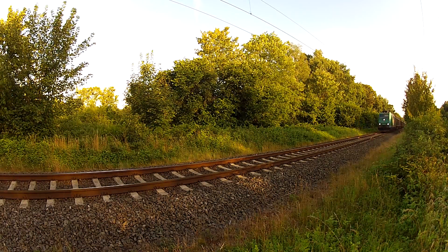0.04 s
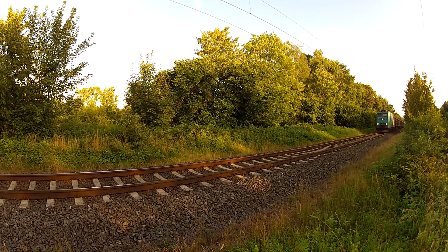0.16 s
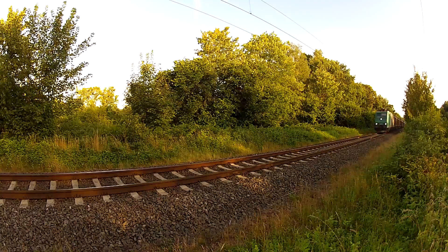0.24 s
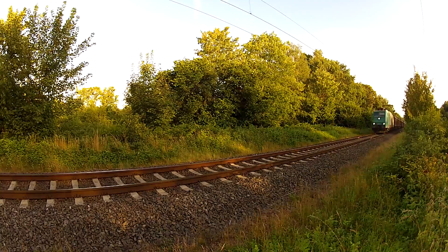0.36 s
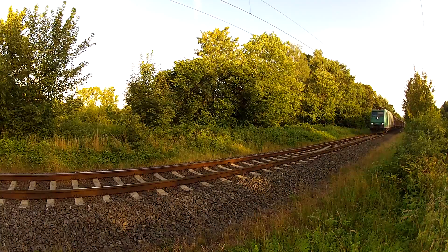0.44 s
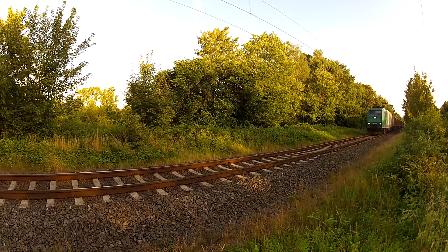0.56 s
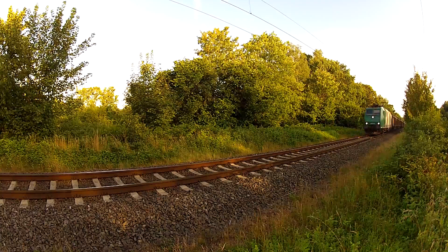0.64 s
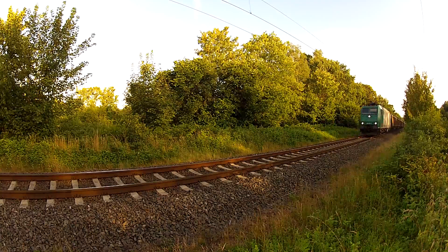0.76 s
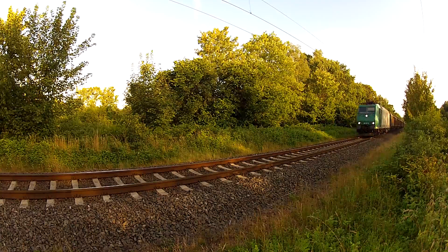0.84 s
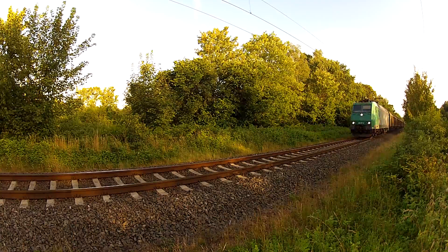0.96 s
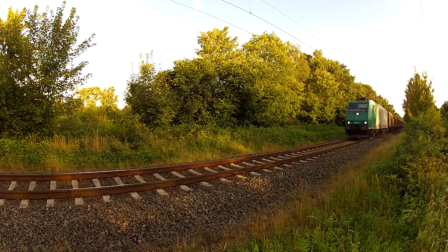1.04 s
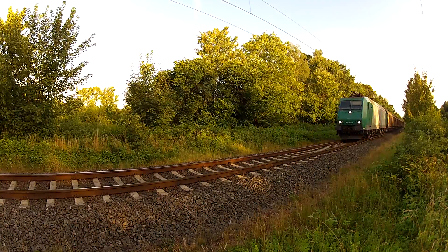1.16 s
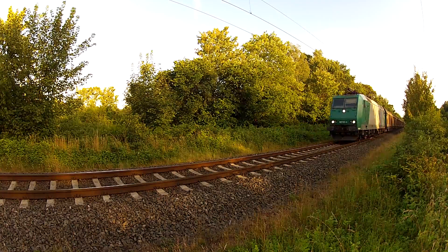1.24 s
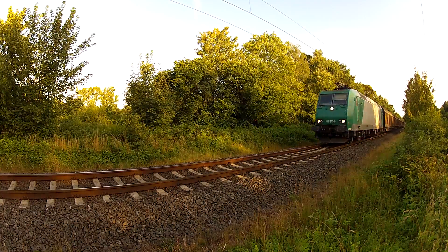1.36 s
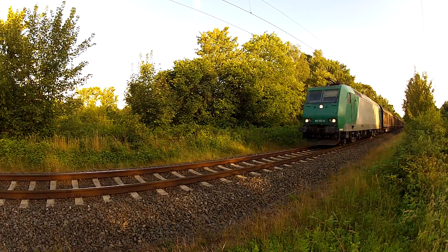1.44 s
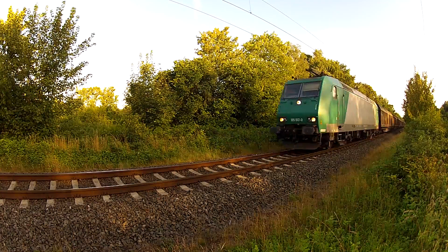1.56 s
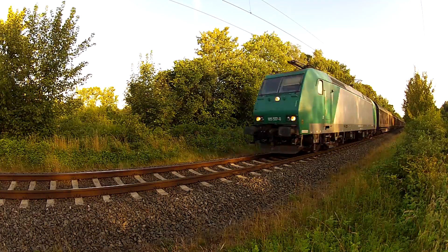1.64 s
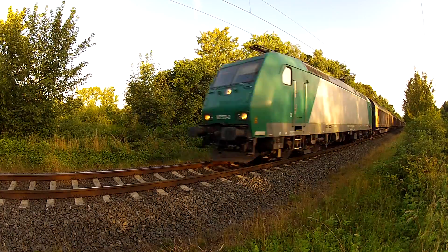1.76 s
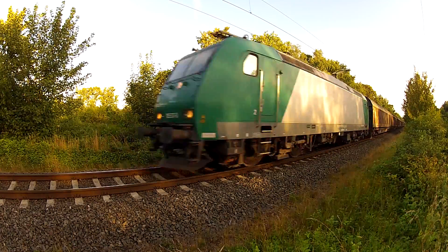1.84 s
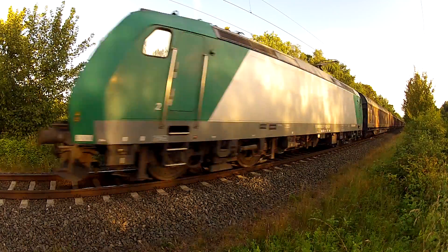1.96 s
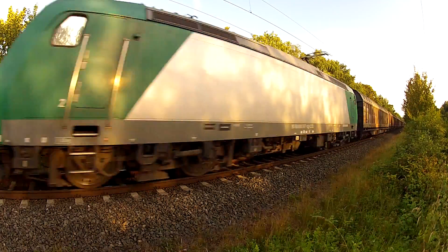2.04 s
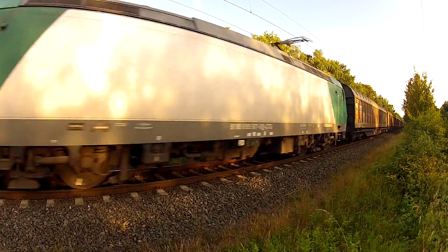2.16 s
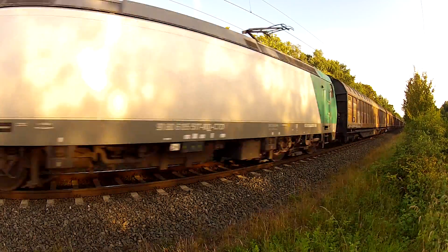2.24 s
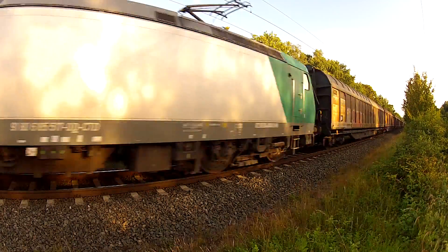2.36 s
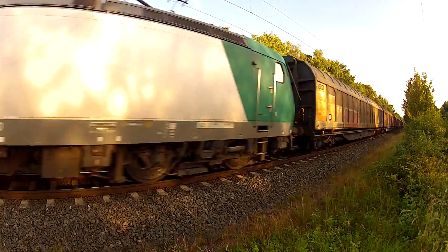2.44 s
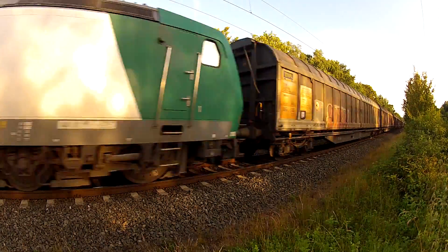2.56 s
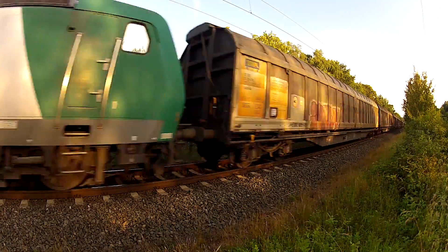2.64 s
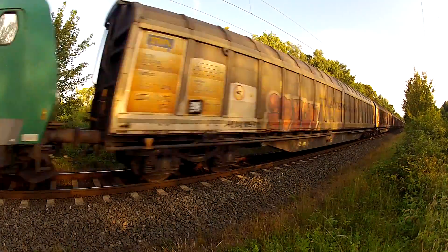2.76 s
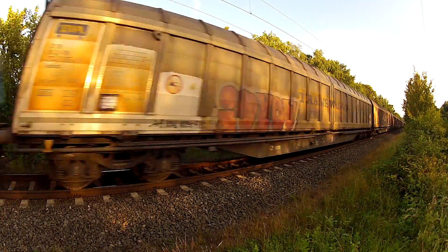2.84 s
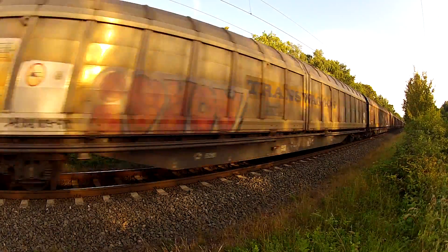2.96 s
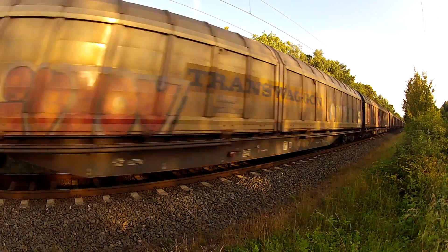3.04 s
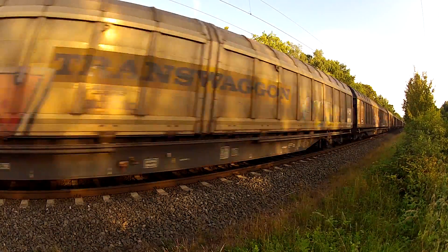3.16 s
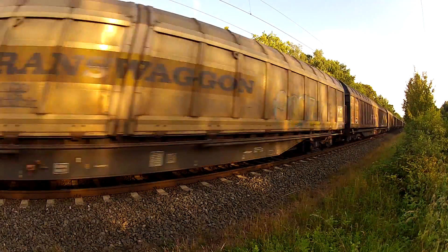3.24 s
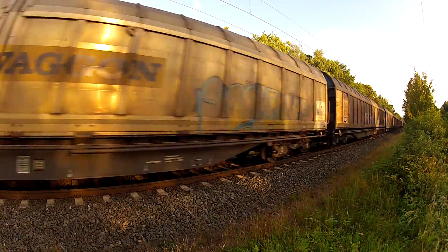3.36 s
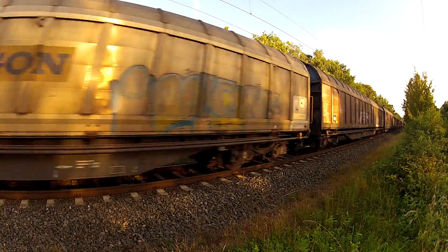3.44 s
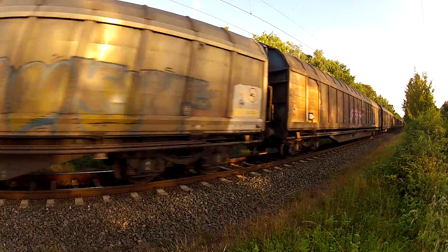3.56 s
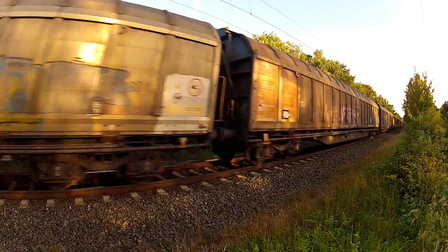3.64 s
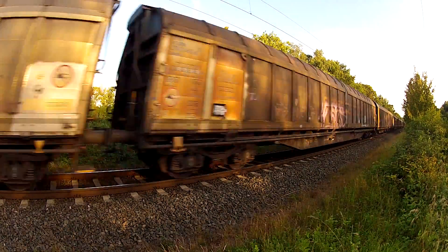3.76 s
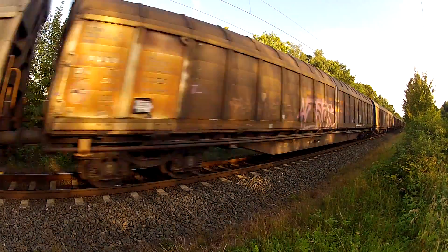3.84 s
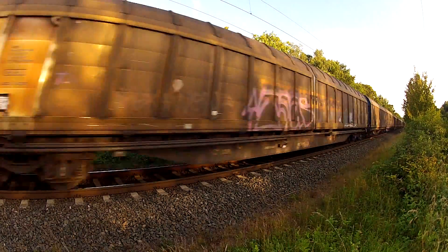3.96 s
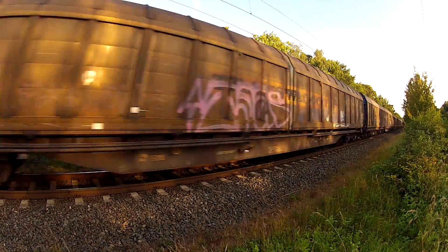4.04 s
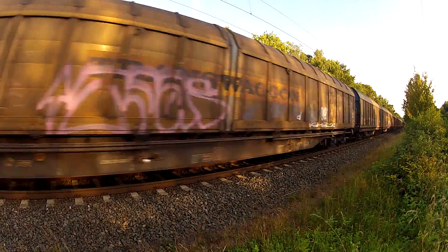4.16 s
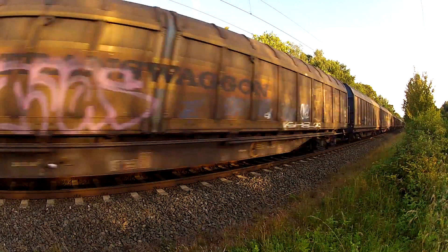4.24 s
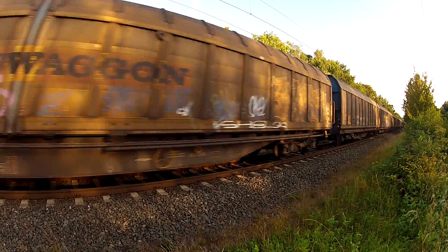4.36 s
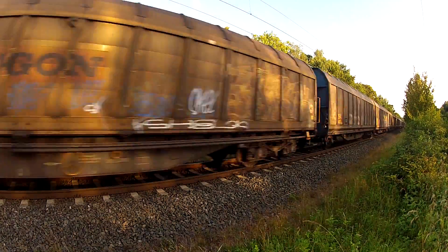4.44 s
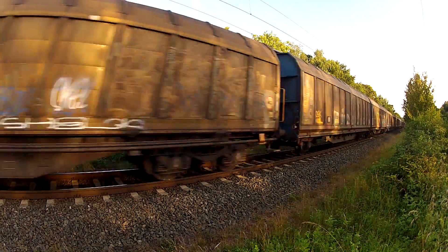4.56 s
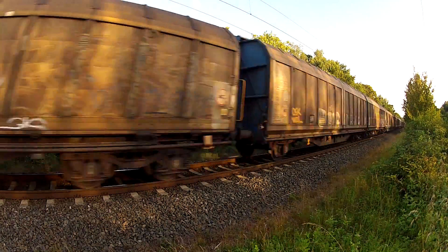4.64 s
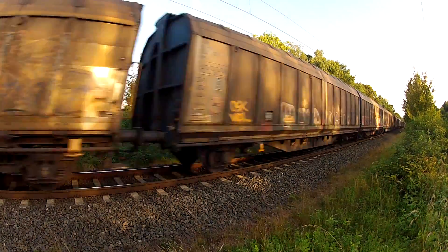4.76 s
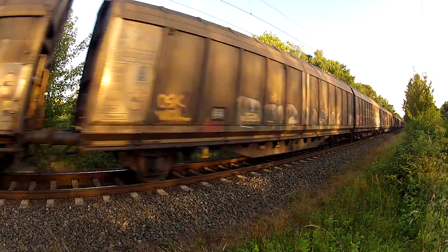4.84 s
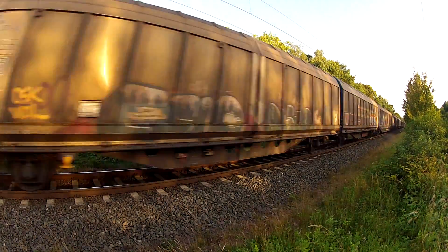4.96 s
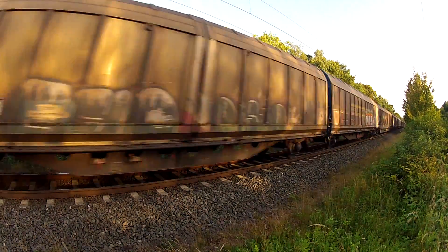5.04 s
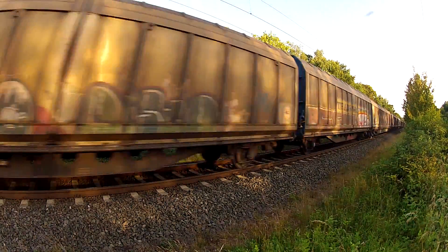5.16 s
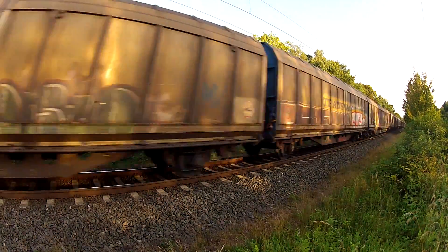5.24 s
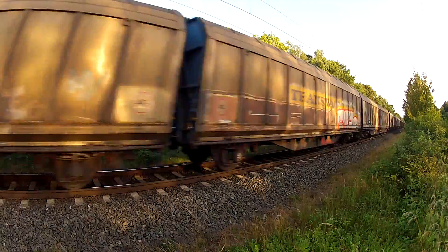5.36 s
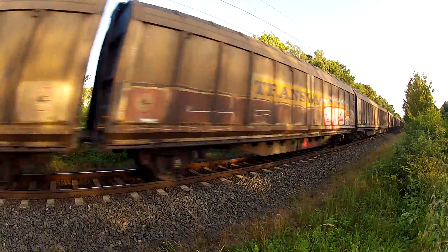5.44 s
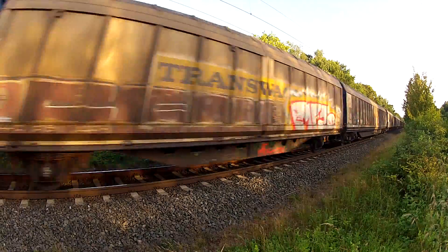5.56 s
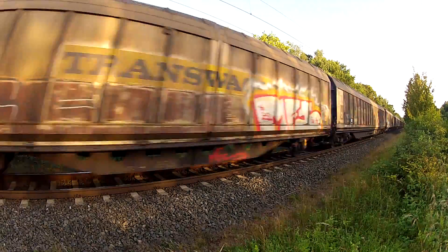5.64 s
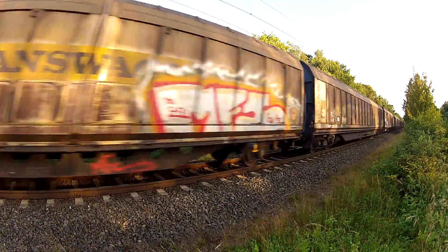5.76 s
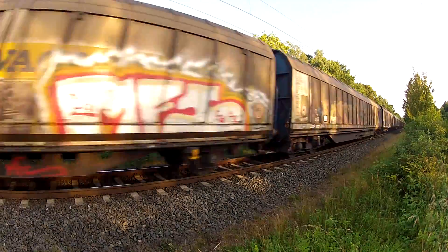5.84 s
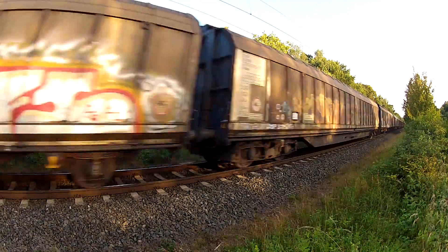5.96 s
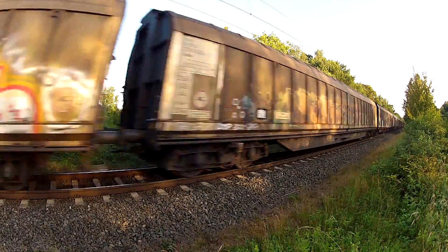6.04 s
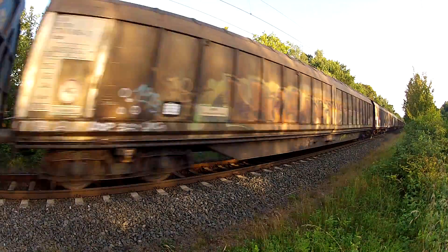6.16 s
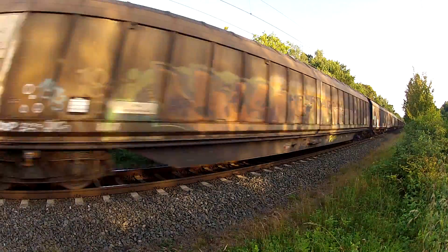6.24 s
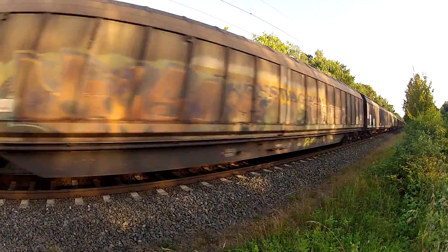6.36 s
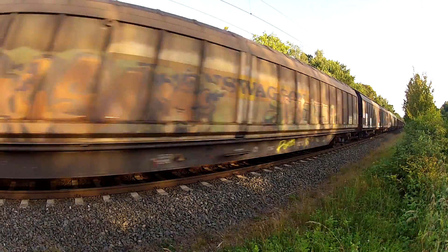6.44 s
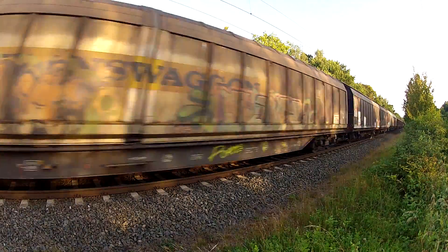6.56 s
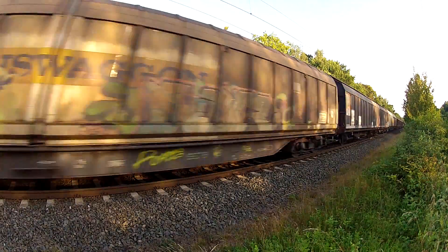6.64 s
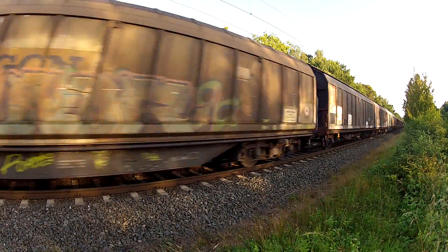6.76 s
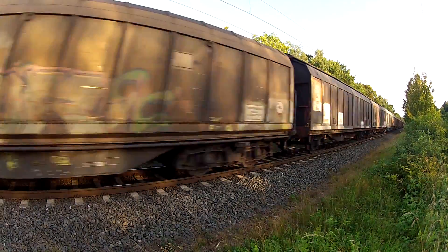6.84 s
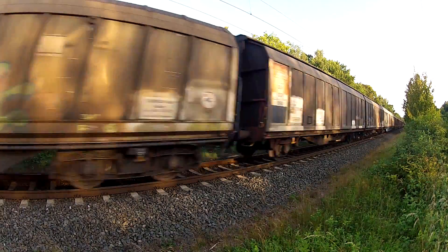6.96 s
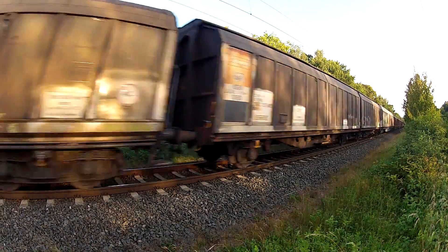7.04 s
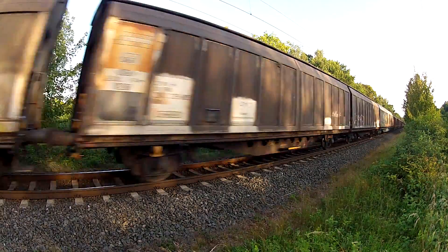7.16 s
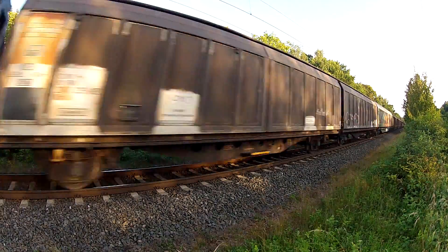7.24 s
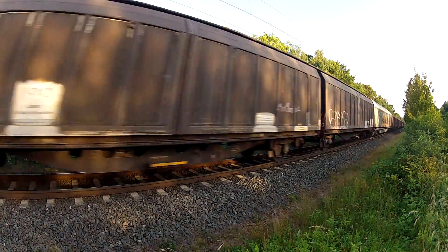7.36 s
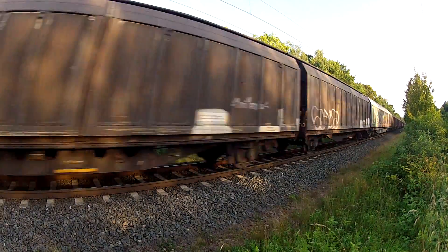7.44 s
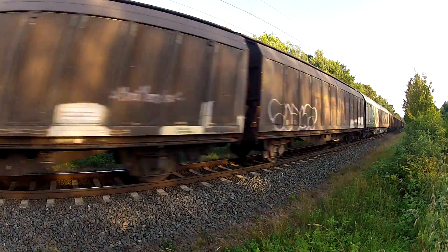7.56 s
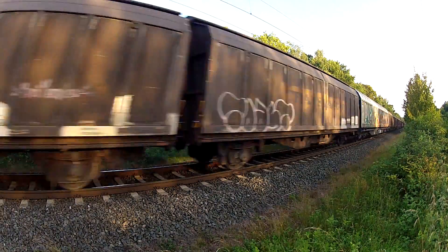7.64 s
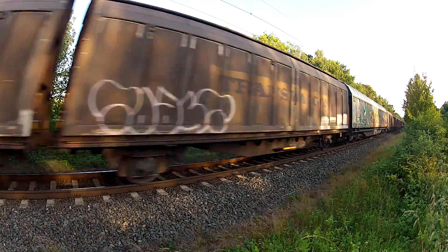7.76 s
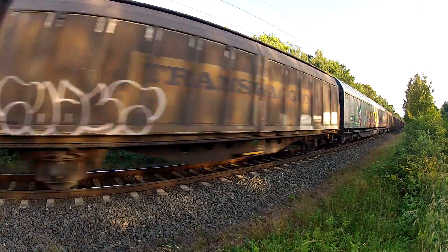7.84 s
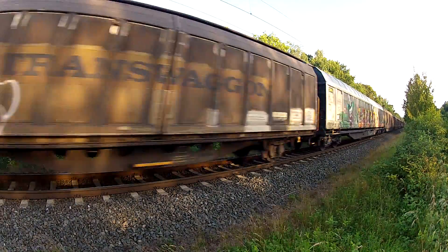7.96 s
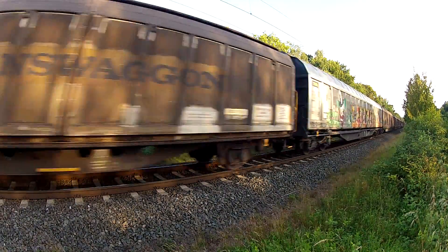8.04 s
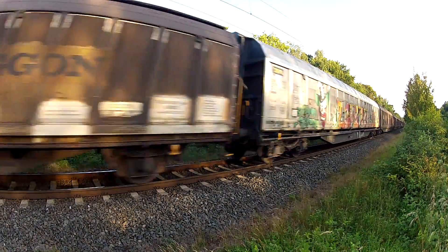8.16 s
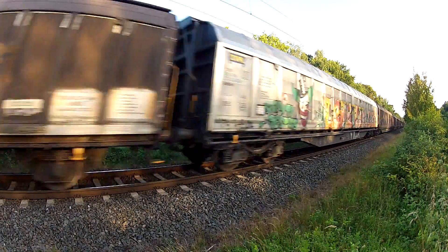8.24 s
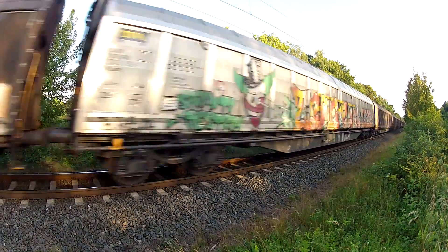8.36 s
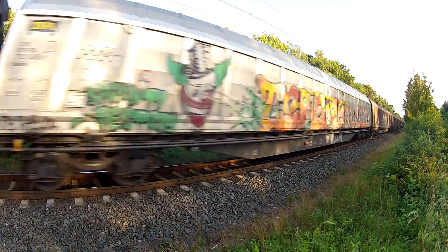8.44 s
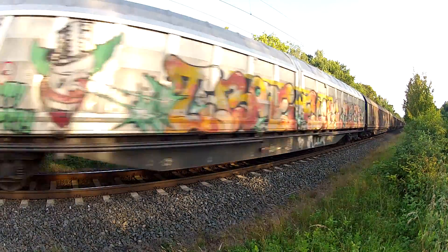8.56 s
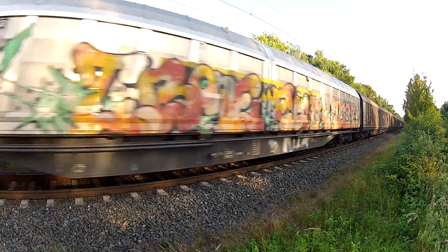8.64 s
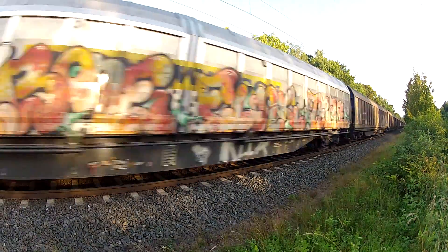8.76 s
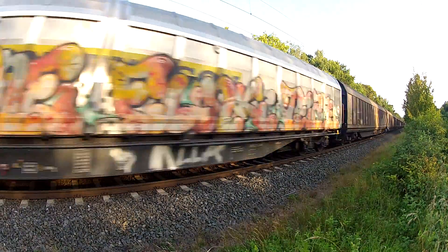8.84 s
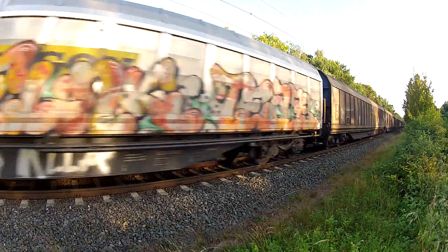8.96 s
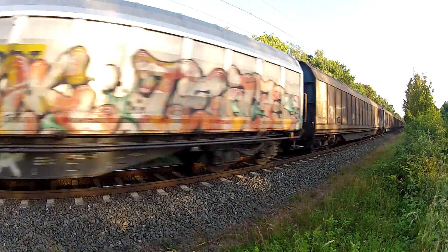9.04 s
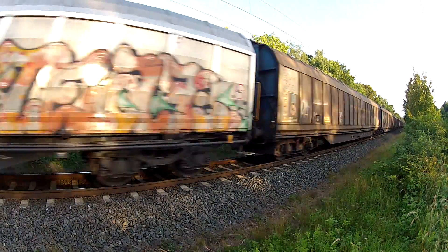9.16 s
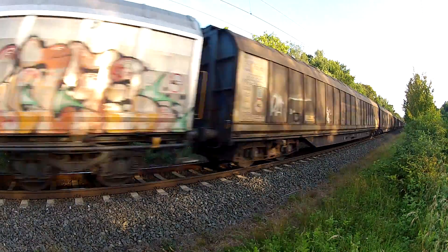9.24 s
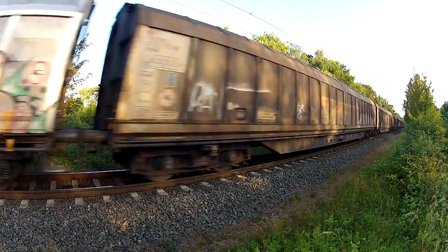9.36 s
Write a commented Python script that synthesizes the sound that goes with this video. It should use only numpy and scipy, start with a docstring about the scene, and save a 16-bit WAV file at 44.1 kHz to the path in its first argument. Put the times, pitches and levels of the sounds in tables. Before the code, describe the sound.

A long freight train passes a small stationary microphone at close range in the open air. It starts almost silent, swells sharply within about two seconds as the whining locomotive arrives, then continues as rumbling, pulsing wagons. Rough wheels ring louder in some passes and softer in others, with short singing tones, occasional steel clinks and grainy, lo-fi high frequencies. The train is still passing at the end.

```python
"""An electric freight train rounds a bend and rolls past a few metres away on welded rails, locomotive first.
Rolling contact excites resonances of wheels and track; the axles drum over the sleepers and shake the ground.
The locomotive whines with a Doppler fall, single wheels sing out and loose fittings clink over a faint hush.
A small camera hears it: sampling slowly and holding each value folds the sound into a gritty treble."""
import sys
import numpy as np
from scipy import signal
from scipy.fft import rfft, irfft, next_fast_len
from scipy.io import wavfile

SR = 44100
rng = np.random.default_rng(int(sys.argv[2]) if len(sys.argv) > 2 else 0)


def wav_out(sig):
    """Save sig, one row per channel (or a flat mono array), as 16-bit PCM at SR to the path in sys.argv[1]."""
    wavfile.write(sys.argv[1], SR, np.round(np.clip(np.atleast_2d(sig).T, -1, 1) * 32767).astype(np.int16))


N = 414981
TIME = np.arange(N) / SR
FFT_SIZE = next_fast_len(N)
FREQS = np.maximum(np.arange(FFT_SIZE // 2 + 1) * SR / FFT_SIZE, 1)  # Hz, kept above zero for the logarithm

SPEED_M_S, SOUND_M_S = 22.9, 343
SLEEPER_HZ = 38.1  # sleepers crossed per second
LOCO_PASSES_S, LOCO_DISTANCE_M = 2.3, 11
AIR_REACH_M, GROUND_REACH_M = 6.2, 7.44  # along the track, where a bogie's amplitude has dropped to half


def undb(db):
    """Decibel definition: a level becomes an amplitude ratio."""
    return 10 ** (np.asarray(db) / 20)


def curves(table):
    """Linear interpolation in time: each column after the first becomes a curve."""
    times_s, *columns = np.transpose(table)
    return [np.interp(TIME, times_s, column) for column in columns]


def noise(gain):
    """Linear filtering: white noise is weighted by a gain at each frequency and scaled to rms 1."""
    spectrum = gain * rfft(rng.standard_normal(FFT_SIZE))
    x = irfft(spectrum, FFT_SIZE)[:N]
    return x / np.std(x)


def coloured(points):
    """Spectral shaping: noise follows (Hz, dB) points joined on a logarithmic frequency axis."""
    hz, db = np.transpose(points)
    levels_db = np.interp(np.log(FREQS), np.log(hz), db, left=-90, right=-90)
    return noise(undb(levels_db))


def resonance(hz, width_hz):
    """Random excitation of a resonance: noise in a steep band, at half amplitude at the edges of its width."""
    return noise(1 / (1 + (2 * (FREQS - hz) / width_hz) ** 2))


def walk(rate_hz):
    """Slow random fluctuation: Gaussian lowpass noise scaled to a standard deviation of 1."""
    size = N // 50
    fluctuation_hz = np.arange(size // 2 + 1) * SR / N
    lowpass = np.exp(-(fluctuation_hz / rate_hz) ** 2 / 2)
    x = irfft(lowpass * rfft(rng.standard_normal(size)), size)
    return np.interp(TIME, np.linspace(0, N / SR, size), x / np.std(x))


def turn(hz):
    """Phase is the time integral of frequency."""
    return 2 * np.pi * np.cumsum(hz) / SR


# spectrum of the outdoor hush: pitch_hz [Hz], level_db [dB, relative]
HUSH_SPECTRUM = [(15, 0), (50, 1), (120, -5.5), (220, -1.5), (330, -10), (600, -26), (1100, -13),
                 (2500, -24), (5500, -30)]


def outdoor_hush():
    """Ambient noise: a broad spectrum whose level drifts at random."""
    return coloured(HUSH_SPECTRUM) * undb(-63 + walk(2.5))


# loose fittings and couplings: start_s [s], pitch_hz [Hz], level_db [dB]
CLINK_EVENTS = [(2.275, 3440, -36), (4.782, 3420, -28), (5.198, 5680, -43), (5.482, 5560, -45),
                (5.893, 5500, -47), (6.092, 3650, -37), (6.598, 4900, -51), (6.676, 3720, -43),
                (8.162, 4680, -39)]


def clinks(t60=.15, rise_s=.004, split_hz=45):
    """Impact and free decay: steel knocks on steel and rings briefly in a close pair of modes."""
    out, t = np.zeros(N), TIME[:SR // 4]
    envelope = (1 - np.exp(-t / rise_s)) * np.exp(-np.log(1000) * t / t60)  # 60 dB of decay in t60
    chances = rng.standard_normal((len(CLINK_EVENTS), 2))
    for (start_s, pitch_hz, level_db), (split, phase) in zip(CLINK_EVENTS, chances):
        mode = np.sin(2 * np.pi * pitch_hz * t)
        partner = 0.27 * np.sin(2 * np.pi * (pitch_hz + split_hz * split) * t + phase)
        clink = undb(level_db) * envelope * (mode + partner)
        start = int(start_s * SR)
        out[start:start + len(t)] += clink[:N - start]
    return out


# single wheels singing out in passing: middle_s [s], pitch_hz [Hz], level_db [dB rms], half_length_s [s]
SINGING_EVENTS = [(0.703, 1670, -68, 0.29), (0.91, 2360, -72, 0.47), (1.097, 3510, -75, 0.53),
                  (2.08, 3170, -59, .13), (2.597, 1410, -47, 0.072), (3.357, 1664, -49.5, 0.062),
                  (3.665, 1690, -43.5, 0.049), (3.802, 2965, -42, 0.092), (4.034, 2170, -39, 0.046),
                  (4.606, 2975, -42.5, 0.085), (4.855, 3325, -45, .1), (5.2, 1946, -45, 0.14),
                  (5.3, 2060, -42, 0.05), (5.325, 2710, -50, .11), (5.52, 3950, -58, .12),
                  (6.256, 3670, -56.5, 0.15), (6.824, 4160, -58, 0.063), (6.934, 1665, -48, 0.066),
                  (7.047, 1400, -45, 0.073), (7.129, 2856, -46, 0.15), (7.247, 2216, -40.5, 0.096),
                  (8.704, 2474, -44, 0.12), (8.8, 3840, -55, .22), (8.829, 1845, -43, 0.25)]


def singing_wheels(width_hz=32, doppler=.006):
    """Narrow-band modal response: one wheel mode swells and fades, its pitch sinking as the wheel passes."""
    out, in_phase, quadrature = 0, walk(width_hz), walk(width_hz)
    for middle_s, pitch_hz, level_db, half_length_s in SINGING_EVENTS:
        place = (TIME - middle_s) / half_length_s
        phase = turn(pitch_hz * (1 - doppler * np.tanh(place)))
        tone = in_phase * np.sin(phase) + quadrature * np.cos(phase)
        out = out + undb(level_db) * np.exp(-place ** 2 / 2) * tone
    return out


# locomotive drive: time_s [s], level_db [dB rms before its flicker], unsteadiness [0-1]
DRIVE_WHINE = [(0, -85, .6), (.9, -72.5, 0.65), (1.55, -66.5, 0.7), (1.72, -53.5, 0.34), (2.2, -54.5, 1),
               (2.5, -60, .95), (2.88, -55.5, 0.6), (3.2, -73, .77), (3.6, -92, .8)]
# the locomotive's heavy axles: time_s [s], level_db [dB rms]
AXLE_THROB = [(.7, -71), (.95, -56), (1.35, -63), (1.85, -47), (2.15, -52), (2.9, -47), (3.4, -64),
              (4, -90)]
WHINE_HZ = 694  # at the source


def locomotive():
    """Doppler effect: drive whine and axle throb fall in pitch; turbulent air close by breaks up the whine."""
    along_m = SPEED_M_S * (TIME - LOCO_PASSES_S)
    receding = along_m / np.hypot(along_m, LOCO_DISTANCE_M)  # -1 coming, 1 going
    doppler = 1 / (1 + SPEED_M_S / SOUND_M_S * receding)
    level_db, unsteady = curves(DRIVE_WHINE)
    whine = np.sin(turn(WHINE_HZ * doppler) + 1.76 * unsteady * walk(21))
    whine = whine * undb(level_db + 5.0 * unsteady * walk(19))
    throb = np.sin(turn(SLEEPER_HZ * doppler) + .3 * walk(3)) * undb(curves(AXLE_THROB)[0])
    return np.sqrt(2) * (whine + throb)  # a sine of rms 1 peaks at sqrt(2)


# wheels going by: abreast_s [s], then levels before each layer's trim: wheel_ring_db [dB],
# tread_hiss_db [dB], track_roar_db [dB], ground_rumble_db [dB]
BOGIE_PASSES = [(2.2, -42.5, -48.5, -47.5, -37), (2.63, -41, -50.5, -50.5, -36.5),
                (2.94, -42, -49.5, -52.5, -36), (3.76, -36.5, -46.5, -44, -42.5),
                (4.03, -32.5, -38.5, -37.5, -39), (4.6, -37.0, -45, -43, -51),
                (4.84, -33, -40.5, -39, -42.0), (5.28, -41, -49.5, -53, -42),
                (5.68, -44, -50.5, -52, -44.5), (6.12, -43.5, -49.5, -53.5, -43),
                (6.58, -48.5, -54, -60, -41.5), (7.26, -36, -42.5, -41, -42),
                (7.56, -33.5, -43.5, -43, -45), (7.82, -33.0, -41, -38.5, -44),
                (8.22, -33, -40.5, -39, -44), (8.49, -35.5, -44.5, -43, -43.5),
                (8.87, -43, -54, -67, -43.5), (9.44, -31.5, -41, -38, -37)]


def passing(level_db, reach_m):
    """Incoherent summation: powers add as each bogie swells coming abreast and fades as it leaves."""
    coarse_time = TIME[::100]
    abreast_s = np.transpose(BOGIE_PASSES)[0][:, None]
    along_m = SPEED_M_S * (coarse_time - abreast_s)
    each = undb(level_db)[:, None] / (1 + (along_m / reach_m) ** 2)
    return np.interp(TIME, coarse_time, np.sqrt(np.sum(each ** 2, axis=0)))


# spectrum of the ground rumble: pitch_hz [Hz], level_db [dB, relative]
RUMBLE_SPECTRUM = [(48, -28), (60, -10), (74, 3), (86, -1), (101, 0.5), (114, -4), (126, -16), (135, -17),
                   (158, -26), (176, -9), (200, -24), (240, -19.5), (330, -33)]
# spectrum of the deep shudder: pitch_hz [Hz], level_db [dB, relative]
SHUDDER_SPECTRUM = [(8, -22), (18, -18), (25, -4), (32, -7), (41, 2), (52, -3), (64, -21), (90, -35)]
SHUDDER_DB, HEAVY_DB = -43.5, -35  # shudder gain at a heavy load, and the load that counts as heavy
SHUDDER_GROWTH = 1.4  # dB of shudder per dB of load


def ground(sleeper_phase):
    """Forced vibration: bogies shake ballast and wagon bodies at the sleeper rate, its double and in noise."""
    load = passing(np.transpose(BOGIE_PASSES)[4], GROUND_REACH_M)
    double_rate = np.sin(2 * sleeper_phase + walk(2.1))
    rumble = undb(0.5) * coloured(RUMBLE_SPECTRUM) + undb(-9.0) * double_rate
    sleeper_rate = np.sin(sleeper_phase + .8 * walk(2.4))
    shudder = undb(-1) * coloured(SHUDDER_SPECTRUM) + undb(-14) * sleeper_rate
    shudder_gain = undb(SHUDDER_DB) * (load / undb(HEAVY_DB)) ** SHUDDER_GROWTH
    return rumble * load + shudder * shudder_gain


# swells of the drumming, where many axles beat together by chance:
# middle_s [s], level_db [dB, before the trims], half_length_s [s]
DRUM_SWELLS = [(2.133, -32.5, 0.017), (2.493, -35, 0.018), (2.86, -32, 0.041), (3.05, -29.5, .07),
               (3.364, -37, 0.038), (3.832, -31, 0.084), (3.985, -36, .025), (4.12, -33, 0.031),
               (4.23, -29.5, 0.041), (4.398, -34.5, .025), (4.676, -38, 0.032), (4.90, -27.5, .04),
               (5.077, -28.5, .025), (5.193, -36, .035), (5.367, -32, 0.033), (5.545, -28.5, 0.059),
               (5.705, -32.5, .03), (5.987, -31, 0.028), (6.2, -30, 0.12), (6.383, -31, 0.049),
               (6.526, -33.5, 0.031), (6.688, -31.5, 0.022), (7.196, -30.5, 0.068), (7.424, -27.5, .035),
               (7.67, -26, .035), (7.79, -29, 0.05), (8.013, -26.5, 0.039), (8.364, -30, 0.082),
               (8.53, -31, 0.039), (8.656, -28, 0.052), (9.304, -29, .025), (9.40, -27, 0.046)]
BED_DB = -46  # steady drumming under the swells, before the trims


def drumming(sleeper_phase):
    """Beating: the third sleeper harmonic swells and sinks as many axles beat together, over a noisy drone."""
    harmonic = np.sin(3 * sleeper_phase + .55 * walk(4))
    drone = resonance(108, 16)
    swell_power = 0
    for middle_s, level_db, half_length_s in DRUM_SWELLS:
        place = (TIME - middle_s) / half_length_s
        swell_power = swell_power + undb(level_db) ** 2 * np.exp(-place ** 2)
    swell = np.sqrt(swell_power)
    ahead_m = SPEED_M_S * np.minimum(TIME - LOCO_PASSES_S, 0)  # zero once the train is here
    bed = undb(BED_DB) / (1 + (ahead_m / GROUND_REACH_M) ** 2)
    harmonic_gain = undb(2.0) * np.hypot(swell, bed * undb(-3 + 5 * walk(7.7)))
    drone_gain = np.hypot(undb(-15.5) * swell, bed)
    return harmonic * harmonic_gain + drone * drone_gain


def approach_db():
    """Structure-borne transmission: the rails sing ahead of the train, louder until it arrives."""
    return 3.5 * np.minimum(TIME - LOCO_PASSES_S, 0)  # rising 3.5 dB per second


def ring(modes, rough, waver_db, strand_db, strand_hz):
    """Modal superposition: many wheels ring in bands, the nearest as thin strands wandering in pitch."""
    out, power, drift = 0, 0, walk(2)
    for hz, width_hz, smooth_db, rough_db in modes:
        level_db = smooth_db + rough * (rough_db - smooth_db)
        gain = undb(level_db) * np.sqrt(width_hz)  # the level is per Hz of width
        waver = walk(8.7)
        strand = np.sin(turn(hz * (1 + .012 * drift))) * walk(strand_hz)
        strand *= undb(strand_db + 2.7 * waver)
        strand *= min(1, np.sqrt(200 / width_hz))  # well damped modes hardly sing
        out = out + gain * (undb(waver_db * waver) * resonance(hz, width_hz) + strand)
        power = power + gain ** 2
    return out / np.sqrt(power)


# wheel resonances: pitch_hz [Hz], width_hz [Hz], smooth_tread_db, rough_tread_db [dB per Hz, relative]
RING_RESONANCES = [(1120, 102, -6.5, -6.5), (1393, 247, 1, 2.5), (1662, 310, 2, 0.5), (1820, 90, 1, -1.5),
                   (1970, 126, 2, -6.5), (2217, 385, 4.5, 5.5), (2434, 150, 3, 3.5),
                   (2740, 167, -2.5, -0.5), (2906, 365, -5, -2.5)]
# tread hiss resonances: pitch_hz [Hz], width_hz [Hz], smooth_tread_db, rough_tread_db [dB per Hz, relative]
HISS_RESONANCES = [(3404, 300, -3.5, -4), (3720, 420, -6, -8), (4246, 150, -14, -14),
                   (4880, 3700, -15.5, -18.5), (5460, 1150, -21, -22.5)]
# spectrum of the track roar: pitch_hz [Hz], level_db [dB per Hz, relative]
TRACK_SPECTRUM = [(140, 2.5), (200, -4), (245, -1), (285, -1), (335, 3), (450, -0.5), (620, -1.5),
                  (760, -2.5), (860, -7.5), (1000, -16.5), (1200, -18)]
# the rail's bounce: time_s [s], share of the track's sound power [0-1]
RAIL_BOUNCE = [(0, 0.09), (6.6, 0.01), (7.1, 0.71), (8.8, 0), (9.41, 0.7)]
# carried along the rails from the rest of the train, before each layer's trim
RAIL_WHEEL_DB, RAIL_HISS_DB, RAIL_TRACK_DB = -56, -66, -61.5
SMOOTH_DB, ROUGH_DB = -42, -33  # wheel ring of smooth and of rough treads, before its trim


def rolling(sleeper_phase):
    """Roughness excitation: rough treads ring louder; contact force flutters at twice the sleeper rate."""
    _, wheel_db, hiss_db, track_db, _ = np.transpose(BOGIE_PASSES)
    rail_rise_db = approach_db()

    def heard(near_db, rail_db):
        """Power addition of airborne and rail-borne sound."""
        return np.hypot(passing(near_db, AIR_REACH_M), undb(rail_db + rail_rise_db))

    wheel_gain = heard(wheel_db, RAIL_WHEEL_DB)
    wheel_level_db = 20 * np.log10(wheel_gain)
    rough = np.clip((wheel_level_db - SMOOTH_DB) / (ROUGH_DB - SMOOTH_DB), 0, 1)  # loud wheels are rough
    wheels = ring(RING_RESONANCES, rough, waver_db=0.8, strand_db=-6, strand_hz=17.5)
    wheels = wheels * wheel_gain * undb(-0.72)
    hiss = ring(HISS_RESONANCES, rough, waver_db=0.93, strand_db=-8, strand_hz=22)
    hiss = hiss * heard(hiss_db, RAIL_HISS_DB) * undb(0.64)
    bounce = np.clip(curves(RAIL_BOUNCE)[0], 0, 1)
    track = np.sqrt(1 - bounce) * coloured(TRACK_SPECTRUM) + np.sqrt(bounce) * resonance(604, 320)
    track = track * heard(track_db, RAIL_TRACK_DB) * undb(-0.4)
    flutter_db = 0.32 * np.sin(2 * sleeper_phase + walk(4.6)) + 0.5 * walk(45)
    return (wheels + hiss) * undb(flutter_db) + track


def scene():
    """Linear superposition: the whole train heard from beside the track over a faint outdoor hush."""
    sleeper_phase = 2 * np.pi * SLEEPER_HZ * TIME
    background = outdoor_hush() + clinks() + singing_wheels() + locomotive()
    train = ground(sleeper_phase) + drumming(sleeper_phase) + rolling(sleeper_phase)
    return (background + train)[None]


HOLD_HZ, TOP_HZ = 12000, 15300  # the camera's sample rate and the cut of the treble


def record(dry):
    """Sample and hold: slow sampling mirrors the sound into a gritty treble; a lowpass then cuts the top."""
    guard = signal.firwin(147 * 26 + 1, .483 * HOLD_HZ, fs=40 * SR)  # 12000 / 44100 = 40 / 147
    slow = signal.resample_poly(dry, HOLD_HZ, SR, axis=1, window=guard)
    steps = np.repeat(slow, 4, axis=1)
    held = signal.resample_poly(steps, SR, 4 * HOLD_HZ, axis=1)
    top_cut = signal.firwin(801, TOP_HZ, fs=SR)[None]
    return signal.fftconvolve(held, top_cut, "same", axes=1)


dry = scene()
out = record(dry)
wav_out(out)
```